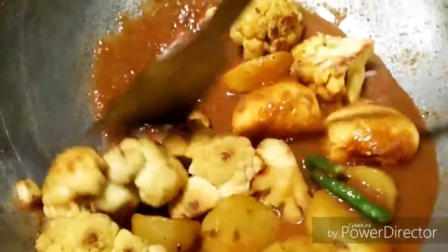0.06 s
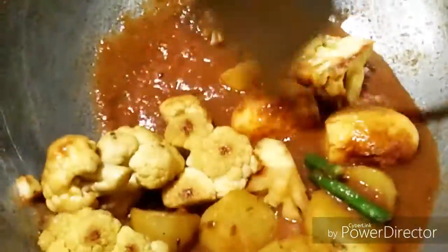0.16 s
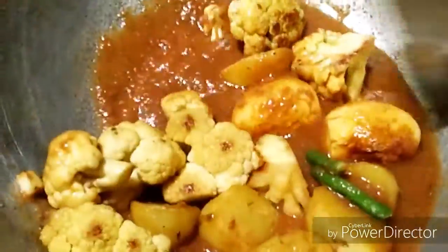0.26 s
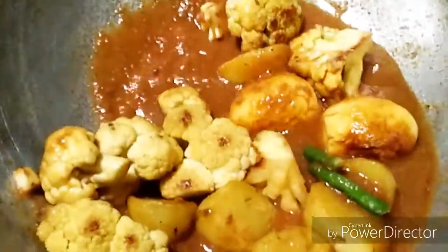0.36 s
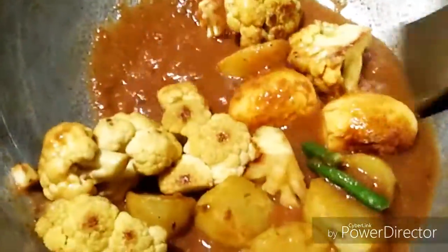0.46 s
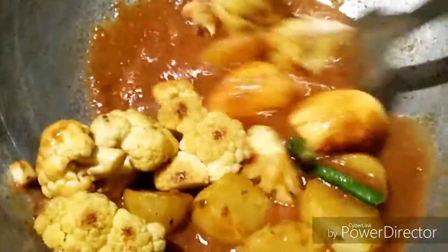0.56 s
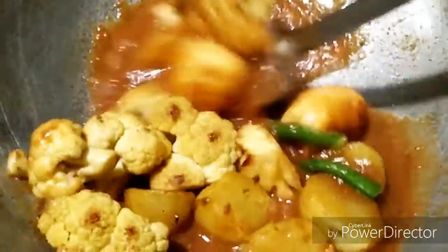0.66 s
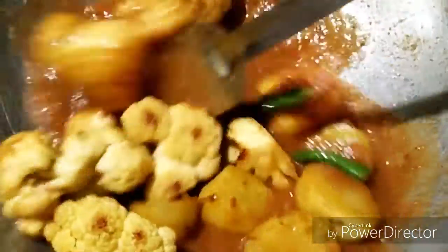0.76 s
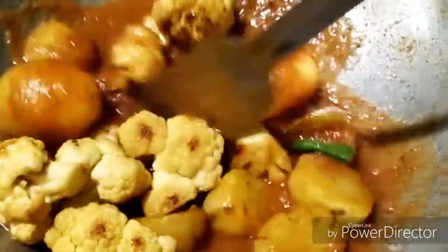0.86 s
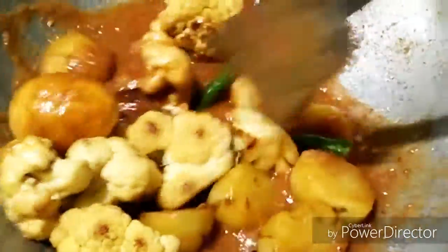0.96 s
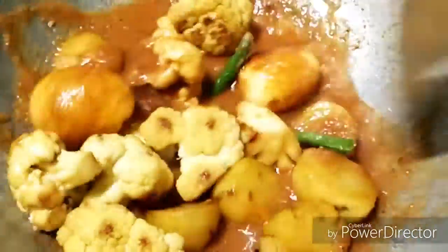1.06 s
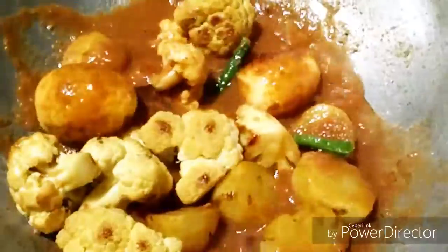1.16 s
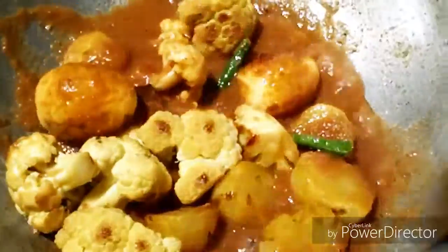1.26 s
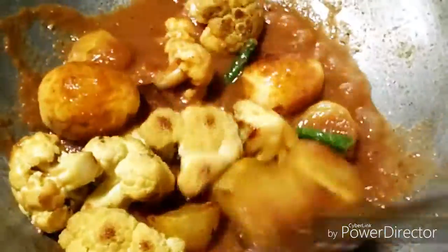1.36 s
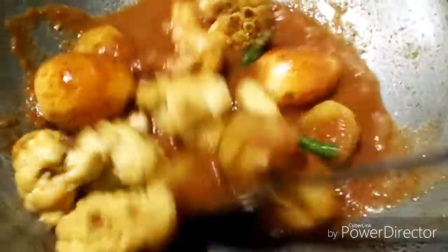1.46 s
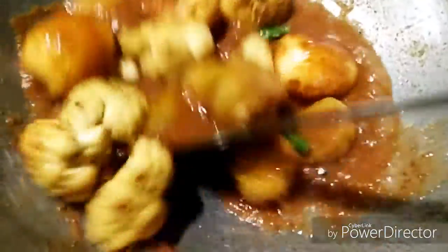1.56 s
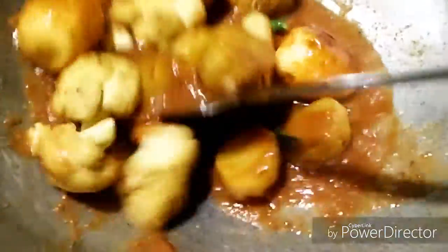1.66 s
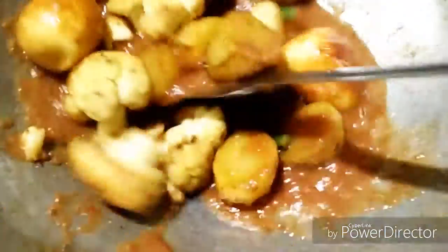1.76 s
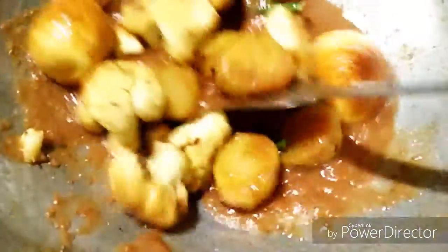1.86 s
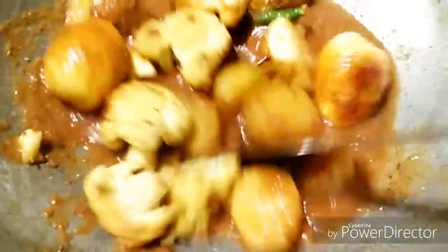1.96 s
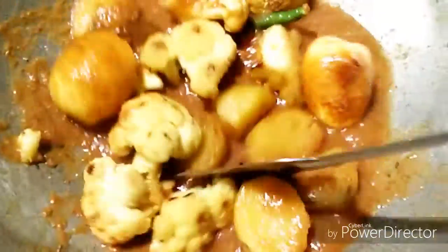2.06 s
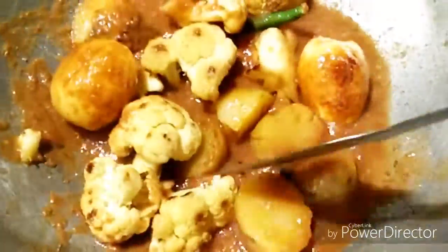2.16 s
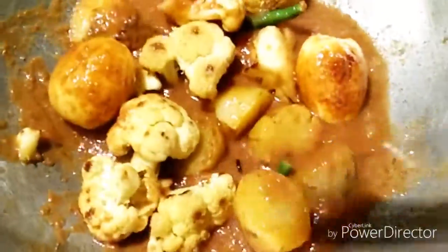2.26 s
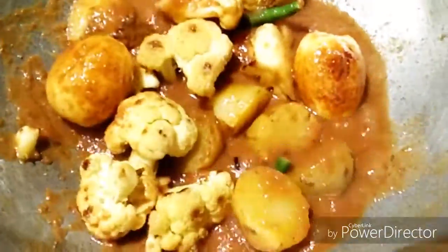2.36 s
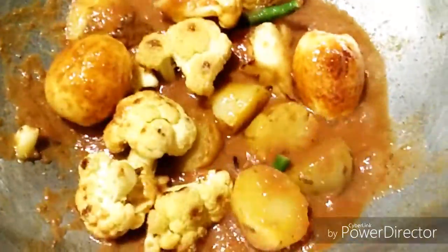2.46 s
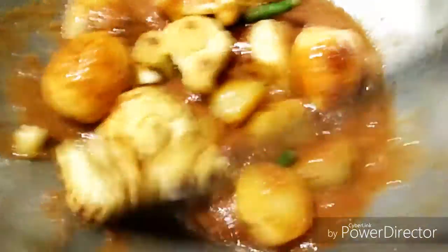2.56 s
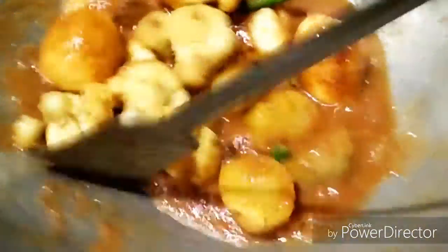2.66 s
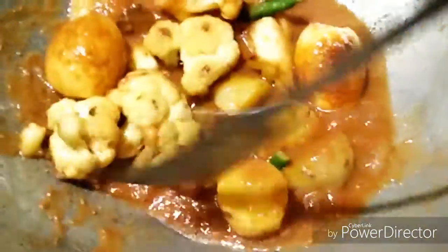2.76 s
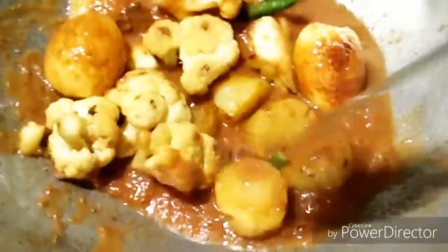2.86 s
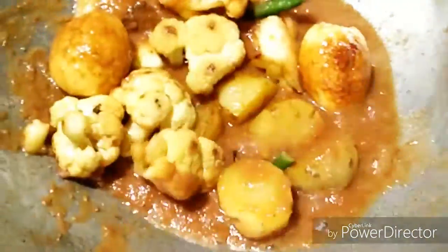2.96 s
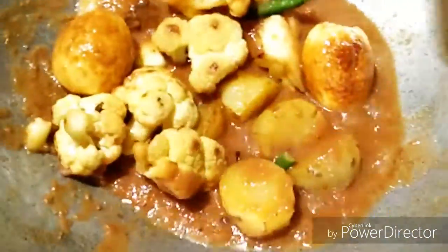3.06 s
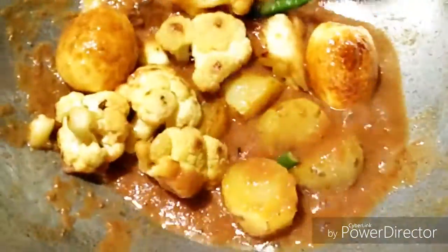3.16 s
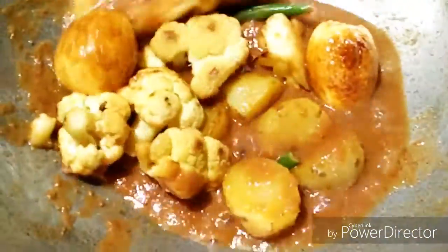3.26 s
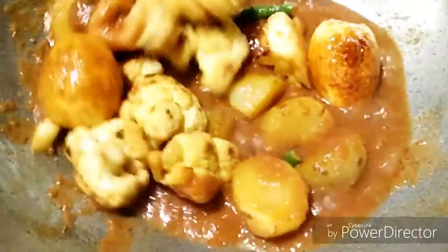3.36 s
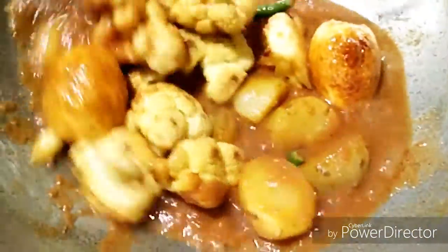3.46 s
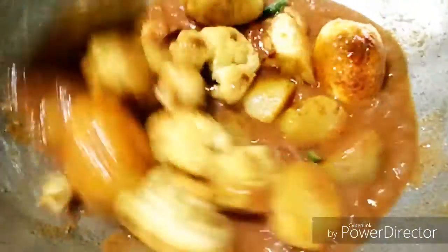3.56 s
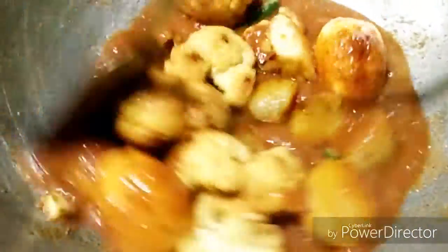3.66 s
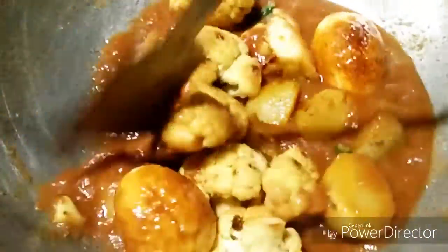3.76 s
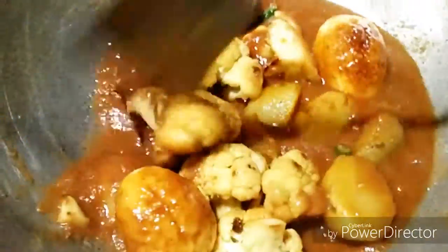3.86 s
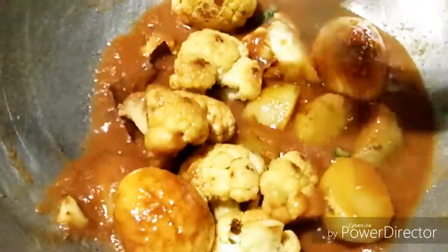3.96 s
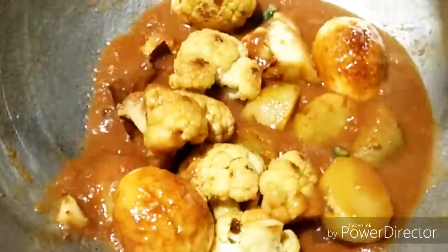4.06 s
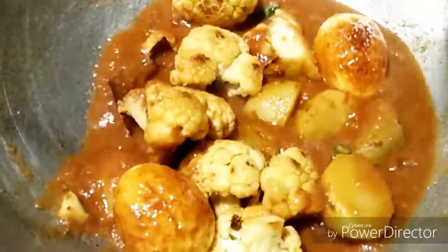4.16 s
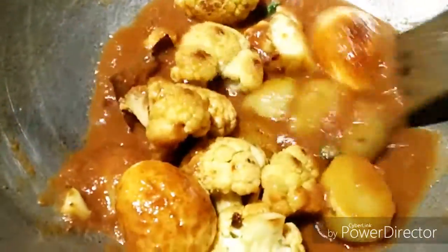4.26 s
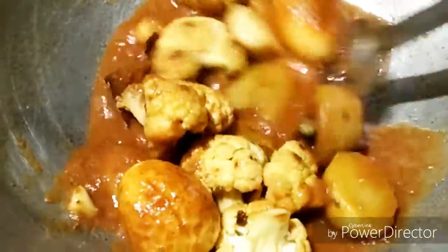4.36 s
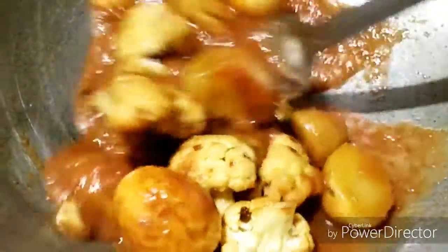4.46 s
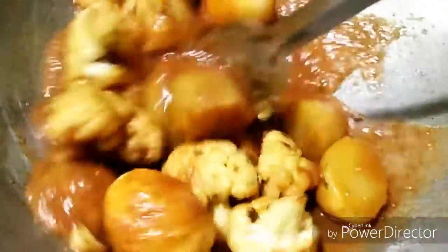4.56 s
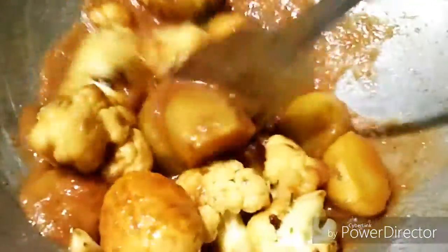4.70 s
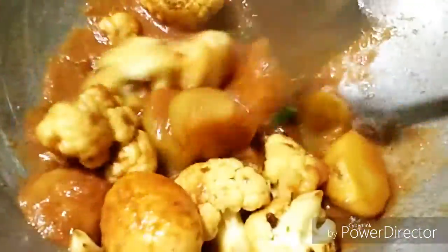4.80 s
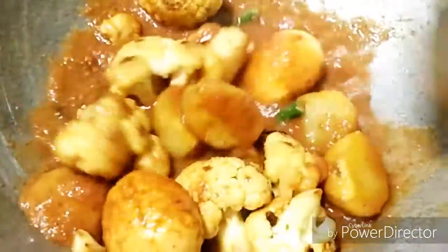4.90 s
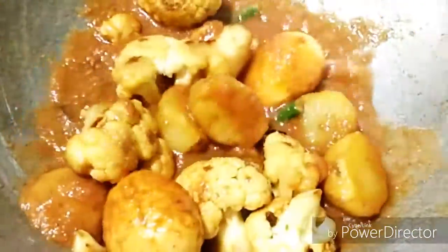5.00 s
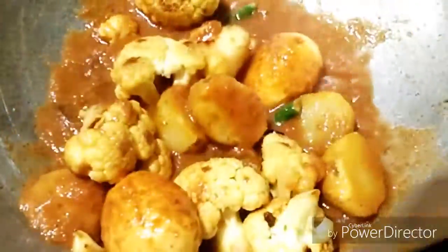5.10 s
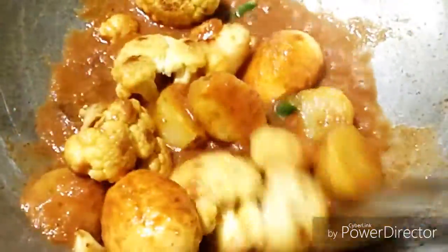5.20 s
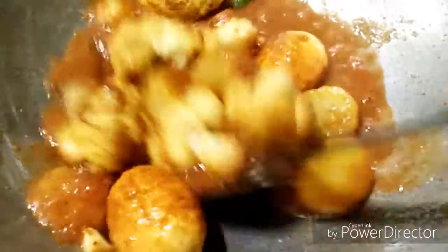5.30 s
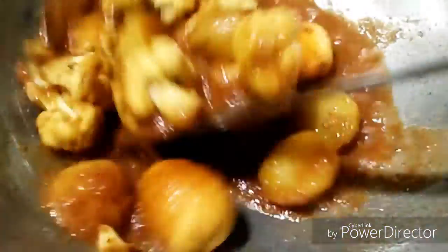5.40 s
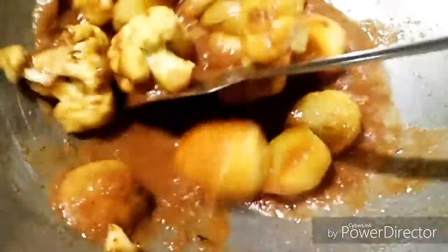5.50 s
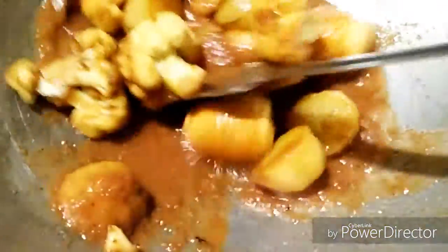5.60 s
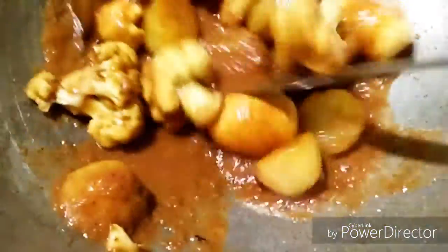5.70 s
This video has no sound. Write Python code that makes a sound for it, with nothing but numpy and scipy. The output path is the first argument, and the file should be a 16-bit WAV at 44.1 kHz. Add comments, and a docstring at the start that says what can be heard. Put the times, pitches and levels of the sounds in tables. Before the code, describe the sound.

A metal spatula scrapes and clanks in a metal wok, turning vegetables in thick wet sauce, with brief squeals and faint bubbling hiss.

```python
"""A steel spatula turns vegetables in thick sauce in a metal wok, close by in a small kitchen.
Each stroke pushes noise of steel, edge and wet food; bouncing clanks are damped blade and wok modes.
In two passages the edge sticks, slips and squeals, a gliding tone with overtones and grit.
Small pops, ringing cavities with a splash, fall throughout; below lie a fine hiss of random clicks
with short louder puffs, room noise and a faint low hum.
"""
import sys
import numpy as np
from scipy import signal
from scipy.fft import rfft, irfft
from scipy.io import wavfile
from scipy.ndimage import uniform_filter1d

SR = 44100
rng = np.random.default_rng(int(sys.argv[2]) if len(sys.argv) > 2 else 0)


def transcribe(signal):
    """Save signal, clipped to [-1, 1], as a 16-bit WAV file at the path in sys.argv[1]."""
    frames = np.atleast_2d(signal).T
    limited = np.clip(frames, -1, 1)
    pcm = np.round(limited * 32767).astype(np.int16)
    wavfile.write(sys.argv[1], SR, pcm)


N = 253089
TIME = np.arange(N) / SR


def amp(db):
    """Decibels to gain."""
    return 10 ** (np.asarray(db) / 20)


def unit(x):
    """Scales to rms 1."""
    return x / np.sqrt(np.mean(x ** 2) + 1e-20)


def read(points, hz):
    """Interpolates a (Hz, value) table on a log-frequency axis."""
    table_hz, value = np.transpose(points)
    return np.interp(np.log(hz + 1), np.log(table_hz + 1), value)


def add(mix, start_s, sound):
    """Mixes a sound in at start_s, or at 0 if that is negative."""
    part = mix[max(round(start_s * SR), 0):][:len(sound)]
    part += sound[:len(part)]


def colour(x, points):
    """Filters x by a (Hz, dB) table, at rms 1."""
    gain = amp(read(points, np.fft.rfftfreq(len(x), 1 / SR)))
    return unit(irfft(rfft(x) * gain, len(x)))


def wander(size, cutoff_hz):
    """Smooth random signal of rms 1: noise through a Gaussian low-pass."""
    hz = np.fft.rfftfreq(size, 1 / SR)
    low_pass = np.exp(-(hz / cutoff_hz) ** 2)
    return unit(irfft(rfft(rng.standard_normal(size)) * low_pass, size))


def grains(size, per_s, spread_db):
    """Random clicks of either sign, most small and a few large, at rms 1."""
    heights = amp(spread_db * np.minimum(rng.exponential(1, size), 5))
    heights = heights * rng.choice([-1, 1], size)
    return unit(heights * (rng.random(size) < per_s / SR))


def resonate(x, hz, width_hz):
    """A single two-pole resonance, at rms 1."""
    r = np.exp(-np.pi * width_hz / SR)
    poles = [1, -2 * r * np.cos(2 * np.pi * hz / SR), r * r]
    return unit(signal.lfilter([1, 0, -1], poles, x))


def fade(t, t60_s):
    """Dies by 60 dB in t60_s."""
    return np.exp(-np.log(1000) * t / t60_s)


def ring(t, hz, t60_s):
    """One dying mode."""
    return np.sin(2 * np.pi * hz * t) * fade(t, t60_s)


# Wok modes. Each row: frequency in Hz, mean level in dB, t60 in seconds.
WOK_MODES = [(357.91, -19, 0.3548), (419.55, -38.5, .3), (579.72, -31, 0.28), (693.86, -18, 0.16),
             (791, -39, 0.11), (1139.7, -37, 0.054), (1411.9, -27.5, 0.16), (1503.6, -30.5, 0.12),
             (2222.5, -13.5, 0.034), (2854.6, -13.5, 0.11), (3137.3, -21, 0.2), (3774.6, -17.5, 0.12714),
             (4337.4, -13.5, 0.14), (4385.5, -22.5, 0.048), (4826.8, -3.5, 0.031), (5066.6, -5, 0.12),
             (5121, -15, 0.037), (6760, -36, 0.047), (8856, -23.5, .08), (8872.6, -12, 0.023)]


def pan_ring(bowl_db, scatter_db=2.698, wobble_rad=0.7434, wobble_hz=50):
    """The wok's answer to a tap; the pressing blade and the shifting food make each mode waver."""
    t, out = TIME[:16384], 0
    for hz, db, t60_s in WOK_MODES:
        phase = 2 * np.pi * hz * t + wobble_rad * wander(len(t), wobble_hz)
        level_db = db + scatter_db * rng.standard_normal() + bowl_db * (hz < 1000)
        out = out + amp(level_db) * np.sin(phase) * fade(t, t60_s)
    return out


def through_pan(x):
    """A vibration of the blade passed on to the wok, at rms 1."""
    return unit(signal.fftconvolve(x, pan_ring(0))[:len(x)])


# Room noise spectrum. Each row: frequency in Hz, relative level in dB.
ROOM_SPECTRUM = [(20, -8), (33, -7.5), (50, 9), (110, 4), (190, 6.5), (500, -53), (1400, -25.5),
                 (4500, -35), (7000, -10.5), (15000, -37.5)]
# Swells of the hum. Each row: loudest moment in seconds, half length (to 1/e of the dB rise) in seconds,
# rise in dB.
HUM_SWELLS = [(1.037, 0.166, 12), (2.05, 0.2335, 15), (2.712, .15, 4), (3.746, 0.37, 11),
              (4.304, 0.2018, 12.5)]


def background(floor_db=-66, hum_hz=86.5, hum_db=-70, flutter=0.6):
    """Room noise and a fluttering low hum that swells now and then."""
    phase = 2 * np.pi * np.cumsum(hum_hz + 3 * wander(N, 9.5)) / SR
    tone = (1 + flutter * wander(N, 22)) * np.sin(phase) + flutter * wander(N, 29) * np.cos(phase)
    swell_db = sum(db * np.exp(-((TIME - s) / half_s) ** 2) for s, half_s, db in HUM_SWELLS)
    noise = colour(rng.standard_normal(N), ROOM_SPECTRUM)
    return amp(hum_db + swell_db) * unit(tone) + amp(floor_db) * noise


# Short soft puffs of hiss. Each row: start in seconds, length in seconds,
# level added to the steady hiss in dB, before the random flicker.
HISS_PUFFS = [(0.333, 0.048, -55.5), (0.482, 0.02871, -56), (2.297, 0.03833, -61), (2.493, 0.0342, -59.5),
              (3.009, 0.10772, -60.5), (3.157, 0.06277, -53), (4.109, 0.05511, -57.5),
              (4.269, 0.073, -56.5), (4.991, 0.02674, -63), (5.084, 0.04483, -62.5)]
# Hiss spectrum. Each row: frequency in Hz, relative level in dB.
HISS_SPECTRUM = [(30, -40.5), (200, 5.5), (700, -0.5), (1500, 0), (2800, 0), (4400, 2.5), (6500, -6),
                 (10000, -17), (14500, -31)]


def hiss(steady_db=-65, flicker_db=3.5):
    """Fine hiss of dense random clicks, its level flickering, with short louder puffs."""
    level = np.full(N, amp(steady_db))
    for start_s, length_s, db in HISS_PUFFS:
        add(level, start_s, amp(db) * signal.windows.tukey(int(length_s * SR), .15))
    clicks = grains(N, 7000, 2.6)
    return level * amp(flicker_db * wander(N, 35)) * colour(clicks, HISS_SPECTRUM)


def squelch(size, low_hz, high_hz, per_s, cycles, spread_db, count=24):
    """Small wet cavities open at random, each ringing for a few cycles at its own pitch; rms 1."""
    out, t = np.zeros(size), TIME[:SR // 10]
    for hz in np.geomspace(low_hz, high_hz, count) * rng.uniform(0.96198, 1.03, count):
        cavity = ring(t, hz, cycles / hz) * (1 - np.exp(-t * hz))
        sizes = amp(spread_db * np.minimum(rng.exponential(1, size), 4))
        openings = sizes * (rng.random(size) < per_s / count / SR)
        out += hz ** 1.2746 * signal.oaconvolve(openings, cavity)[:size]
    return unit(out)


def patchy(x, depth_db):
    """The contact point keeps shifting: patches of the spectrum come and go; rms 1."""
    z = signal.stft(x, SR, nperseg=256)[2]
    over_hz = uniform_filter1d(rng.standard_normal(z.shape), 4, 0)
    patches = unit(uniform_filter1d(over_hz, 7, 1))
    return unit(signal.istft(z * amp(depth_db * patches), SR, nperseg=256)[1][:len(x)])


# Pushes of the blade. Each row: start in seconds, length in seconds, then levels in dB before the layer
# gains: steel scrape, rasp of the edge, sliding food; last, change of the scrape by the end in dB.
PUSHES = [(-0.02, 0.07202, -38.5, -42.5, -52, 1), (0.041, 0.038195, -28.5, -36.5, -37, -1),
          (0.218, 0.05004, -56.5, -49.5, -51, 3.5), (0.629, 0.10742, -31.5, -40, -45.5, -8.5),
          (0.737, 0.183, -42, -40.5, -40.5, -3), (0.987, 0.2965, -58.5, -53.5, -46, -1),
          (1.451, 0.44437, -46, -46.5, -44, -7.5), (1.945, .288, -53.5, -46.5, -47.5, 6.5),
          (2.609, 0.13293, -45.5, -42, -45, 6), (2.741, 0.07215, -34, -38, -43, -7.5),
          (2.838, 0.09424, -57.5, -48.5, -50.5, 3.5), (3.271, 0.24827, -30.5, -44, -49, -18.5),
          (3.53, .13, -38, -46.5, -42.5, -11), (3.659, .18, -49.5, -44, -44.5, 10),
          (4.396, 0.2152, -39.5, -39, -41.5, -5), (4.609, 0.2964, -49, -44, -48.5, -5.5),
          (5.28, 0.11513, -40, -44, -47, 1), (5.389, 0.16176, -38.5, -39, -45.5, -7),
          (5.54, 0.16135, -48, -49, -52, -10.5)]
# Steel on steel. Each row: frequency in Hz, relative level in dB.
SCRAPE_SPECTRUM = [(1400, -53), (2400, -6), (3100, -1), (3700, 0.5), (4400, 2.5), (5600, -3), (6700, -4),
                   (9000, -12.5), (11500, -20.5), (14500, -30.5)]
# The edge in the sauce. Each row: frequency in Hz, relative level in dB.
RASP_SPECTRUM = [(600, -7.5), (1100, 14), (1500, 12.5), (2000, 15), (2700, 10.5), (3800, -13.5),
                 (7000, -29.5), (14500, -49.5)]
# Moving food, also in thuds and flops. Each row: frequency in Hz, relative level in dB.
FOOD_SPECTRUM = [(25, -41.5), (70, -7), (170, -3.5), (350, 6.5), (600, -3.5), (950, -3.5), (1500, -11),
                 (6000, -6.5), (14500, -42.5)]
PUSH_ATTACK_S, PUSH_RELEASE_DB_PER_S = 0.02772, 280
FOOD_DB_PER_S = -14.5  # through a push the food slides clear of the blade


def strokes(scrape_db=-2.0, rasp_db=-10.0, food_db=-10.0, ring_db=-10, judder_db=1.4767,
            patchy_db=3.5, wet_db=-1):
    """The edge catches on countless small bumps while it pushes wet food along."""
    out = np.zeros(N)
    smacks = squelch(N, 916.95, 3148.7, per_s=320, cycles=60, spread_db=-1.5)
    slosh = squelch(N, 180.33, 942.2, per_s=420, cycles=17.933, spread_db=-0.5)
    for start_s, length_s, steel_db, edge_db, slide_db, change_db in PUSHES:
        end_s = start_s + length_s + 30 / PUSH_RELEASE_DB_PER_S  # release runs down 30 dB
        at = np.flatnonzero((TIME >= start_s) & (TIME < end_s))
        t, size = TIME[at] - start_s, len(at)
        release = amp(-PUSH_RELEASE_DB_PER_S * np.maximum(t - length_s, 0))
        push = np.minimum(t / PUSH_ATTACK_S, 1) * release
        pressure = amp(judder_db * wander(size, 51))

        steel = colour(grains(size, 6000, 1.3663) * pressure, SCRAPE_SPECTRUM)
        steel = steel + amp(ring_db) * through_pan(rng.standard_normal(size))
        steel_level = amp(scrape_db + steel_db + change_db * np.minimum(t / length_s, 1))

        edge = colour(grains(size, 4000, 3.0) * pressure, RASP_SPECTRUM)
        edge = unit(edge + amp(wet_db) * colour(smacks[at], RASP_SPECTRUM))

        food = colour(slosh[at] + grains(size, 1100, 1.4), FOOD_SPECTRUM)
        food_level = amp(food_db + slide_db + FOOD_DB_PER_S * t)

        sound = steel_level * patchy(steel, patchy_db)
        sound += amp(rasp_db + edge_db) * edge
        sound += food_level * food
        add(out, start_s, push * sound)
    return out


# Squeals. Each row: start in seconds, length in seconds, moment of the hardest bite in seconds from 0,
# level at mid-length in dB before shaking, first Hz, last Hz (both before bite and drift),
# pitch drop at the bite in Hz, roughness at the bite 0-1.
SQUEALS = [(0.005, 0.07524, .07, -30.5, 865, 731.9, 105, 0),
           (0.054, .095, .083, -27, 706.8, 717.2, 154, 0.53),
           (3.483, 0.2159, 3.575, -50, 1000, 820.4, 2.5, 0.3),
           (3.671, 0.2, 3.77, -38.5, 835, 814.1, 51, 0.17),
           (3.803, .075, 3.835, -34.5, 737.1, 669, 17, 0.16)]
# Grit of the slipping edge. Each row: frequency in Hz, relative level in dB.
GRIT_SPECTRUM = [(100, -54.5), (350, -52.5), (560, 12), (705, 7.5), (850, -4.5), (1140, 12.5), (1450, 7),
                 (1950, -10), (3000, -13.5), (8000, -53)]
# Resonances that the slipping edge shakes. Each row: frequency in Hz, width in Hz,
# level in dB relative to the squeals' overall rms.
SHAKEN_MODES = [(1106, 16.36, -10), (1399.9, 52.36, -10), (1513.4, 52.28, -14.5)]
BITE_S, LIGHT_ROUGH = 0.01659, 0.09775  # bite's 1/e half length; roughness away from the bite
SQUEAL_ENDS_DB = -15.5  # ends of the level arch


def squeals(jitter=0.07887, overtone_db=-2, grit_db=-6, pan_db=-9, drift=0.026173, shake_db=3.5):
    """The edge sticks and slips: biting lowers the tone; roughness adds overtones, grit and wok ring."""
    out, chatter = np.zeros((2, N))
    for start_s, length_s, bite_at_s, mid_db, first_hz, last_hz, drop_hz, bite_rough in SQUEALS:
        t = np.arange(0, length_s, 1 / SR)
        size, along = len(t), t / length_s
        bite = np.exp(-((start_s + t - bite_at_s) / BITE_S) ** 2)
        rough = LIGHT_ROUGH + (bite_rough - LIGHT_ROUGH) * bite

        glide_hz = first_hz + (last_hz - first_hz) * along - drop_hz * bite
        hz = glide_hz * (1 + drift * wander(size, 53.1))
        phase = 2 * np.pi * np.cumsum(hz * (1 + jitter * rough * wander(size, 530))) / SR
        overtones = np.sin(2 * phase) + sum(np.sin(k * phase) / k for k in range(3, 12))
        grit = colour(rng.standard_normal(size), GRIT_SPECTRUM) * (1 + np.cos(phase) / 2)

        arch_db = mid_db + SQUEAL_ENDS_DB * (2 * along - 1) ** 2
        level = amp(arch_db + shake_db * wander(size, 190)) * signal.windows.tukey(size, .04)
        tone = np.sin(phase) + 2 * rough ** 2 * amp(overtone_db) * overtones
        add(out, start_s, level * (tone + rough * amp(grit_db) * grit))
        add(chatter, start_s, level * rough * grit)
    shaken = sum(amp(db) * resonate(chatter, hz, width_hz) for hz, width_hz, db in SHAKEN_MODES)
    return out + np.std(out) * (amp(pan_db) * through_pan(chatter) + shaken)


# Narrow singing slips. Each row: start in seconds, length in seconds, frequency halfway in Hz,
# level in dB before the window.
SCRATCHES = [(0.051, 0.04958, 2906, -36), (0.057, 0.0447, 6230, -36), (0.64, 0.029, 6715, -37),
             (0.877, 0.02508, 6620, -44), (1.475, 0.02723, 5380, -40), (2.681, 0.01793, 4340, -37.5),
             (2.756, 0.0579, 4630, -36.5), (3.292, 0.02978, 4376, -30), (3.346, 0.05114, 4290, -38.5),
             (3.534, 0.0901, 6600, -45), (3.722, 0.09475, 6140, -43), (0.677, 0.01729, 8478, -44.5),
             (4.418, 0.016, 8283, -40), (5.463, 0.06636, 1869, -45.5), (5.607, 0.02025, 4064, -44)]


def scratches(width_hz=450, sink=0.035673):
    """Slips ring a resonance of the blade, which sinks as more of the edge bears on the metal."""
    out = np.zeros(N)
    for start_s, length_s, hz, db in SCRATCHES:
        size = int(length_s * SR)
        along = np.linspace(0, 1, size)
        phase = 2 * np.pi * np.cumsum(hz * (1 - sink * (along - .5))) / SR
        sound = wander(size, width_hz) * np.cos(phase) + wander(size, width_hz) * np.sin(phase)
        add(out, start_s, amp(db) * unit(sound) * signal.windows.tukey(size, .5))
    return out


BUBBLES_PER_S, BUBBLE_DB, BUBBLE_LOW_HZ, BUBBLE_HIGH_HZ = 9.4, -41.5, 1815.6, 5485  # dB before pop_db


def small_bubbles(spread_db=3):
    """Random rows of (s, dB, Hz) for the bubbles of the simmering sauce."""
    rows = []
    for when, size, pitch in rng.random((round(BUBBLES_PER_S * N / SR), 3)):
        hz = BUBBLE_LOW_HZ * (BUBBLE_HIGH_HZ / BUBBLE_LOW_HZ) ** pitch
        rows.append((when * N / SR, BUBBLE_DB + spread_db * (2 * size - 1), hz))
    return rows


# Larger bubbles and wet smacks. Each row: start in seconds, level in dB before pop_db, frequency in Hz.
LARGE_POPS = [(0.806, -18, 1422), (1.023, -27, 2065), (1.977, -29, 1948), (1.1956, -36, 4291),
              (2.437, -41.5, 3560), (3.148, -41.5, 2020), (3.562, -28.5, 1420), (3.678, -33, 1600),
              (3.96, -32, 2393), (4.132, -40, 3620), (4.222, -34.5, 2627), (4.568, -17.5, 1504),
              (4.942, -35, 2114), (5.4119, -24.5, 1240)]


def pops(pop_db=-7, pop_t60_s=0.017126, splash_db=3, splash_width_hz=1100, rise_s=0.0014):
    """A bubble bursts: a few cycles of its cavity and a small splash."""
    out, t = np.zeros(N), TIME[:SR // 20]
    for start_s, db, hz in LARGE_POPS + small_bubbles():
        splash = resonate(rng.standard_normal(len(t)), hz, splash_width_hz)
        splash = resonate(splash, hz, hz) * fade(t, pop_t60_s)
        burst = ring(t, hz, pop_t60_s) + amp(splash_db) * splash
        add(out, start_s, amp(db + pop_db) * (1 - np.exp(-t / rise_s)) * burst)
    return out


# Blade meets pan; where it lands picks two blade modes. Each row: start in seconds, delay of the whole
# edge in seconds, corner level in dB, edge level in dB, centre of the bright band in Hz, low mode in Hz,
# its dB, high mode in Hz, its dB, t60 of both in seconds, change of wok modes under 1 kHz and thud in dB.
KNOCKS = [(0.5344, 0.012273, -11, -9, 4564, 3181, -18, 4330, -21, 0.0624, -16.5),
          (0.6130, 0.0022703, -32.5, -19.5, 5193, 3060, -19, 5600, -18, 0.04715, -12),
          (1.378, .0038, -16.5, -8, 5981, 2895, -7.5, 5920, -4.5, 0.04943, -8),
          (2.5606, .0036, -14, -11, 5243, 2892, -19, 6416, -10, 0.0821, -8.5),
          (2.6110, 0.003694, -24.5, -28, 4668, 3107, -5.5, 6340, -20, 0.03554, -2.5),
          (3.2015, 0.009517, -14.5, -11.5, 5076, 3254, -2, 4480, -3, 0.0315, -13.5),
          (3.276, 0.002472, -26.5, -30, 4403, 3200, -11.5, 4700, -3.5, 0.0749, -14),
          (3.3008, .006, -21.5, -34.5, 4288, 3212, -8, 7600, -8.5, 0.08815, -24),
          (3.412, 0.0036, -30.5, -43, 4080, 3750, 6, 4400, -1.5, 0.04885, -1.5),
          (4.3106, .0095, -13, -5, 4798, 3132, -8, 4780, -18, 0.11625, -14.5),
          (5.1827, 0.0051, -16.5, -19, 5498, 2863, -9, 5253, 4.5, 0.02935, -11.5),
          (5.1959, .002, -19.5, -18, 4985, 3049, -10, 4485, -8.5, 0.0699, -4.5)]
FIRST_RISE_S, LATER_RISE_S = 0.0007295, 0.000547  # onset times of the first contact and the later ones
REBOUND_SHARE, REBOUND_DB = .7, -11.5  # share of the first delay; level relative to the edge


def contacts():
    """Each knock is three contacts: the corner, the whole edge, and a sooner, softer rebound."""
    for start_s, delay_s, corner_db, edge_db, *tone in KNOCKS:
        yield start_s, FIRST_RISE_S, corner_db, *tone
        yield start_s + delay_s, LATER_RISE_S, edge_db, *tone
        rebound_s = start_s + delay_s * (1 + REBOUND_SHARE)
        yield rebound_s, LATER_RISE_S, edge_db + REBOUND_DB, *tone


# Crowded, quickly damped modes of blade and wok. Each row: frequency in Hz, relative level in dB.
CRACK_SPECTRUM = [(30, -58), (150, -45), (300, -19.5), (900, -5.5), (1400, -3.5), (1750, -19), (2400, -11),
                  (3000, 8), (3700, 0), (5000, 9.5), (6300, -0.5), (7300, -4), (9500, -2.5), (11500, -12.5),
                  (14500, -16)]
# Reshaping of the crack into its wash. Each row: frequency in Hz, gain in dB.
WASH_SPECTRUM = [(1500, -8.5), (3100, -7.5), (6000, 4), (9000, -4)]


def knocks(crack_t60_s=0.029005, bright_db=-2, bright_width_hz=1100, crack_db=-1, pan_db=-7,
           wash_db=-12, wash_t60_s=0.017667, thud_db=-18, thud_t60_s=0.33697):
    """Each contact: a crack of crowded modes, the ring of blade and wok, and the thud of jolted food."""
    out, t = np.zeros(N), TIME[:16384]
    for (start_s, rise_s, db, bright_hz, low_hz, low_db, high_hz, high_db,
         blade_t60_s, bowl_db) in contacts():
        crack_noise, bright_noise, thud_noise = rng.standard_normal((3, len(t)))
        bright = resonate(bright_noise, bright_hz, bright_width_hz)
        bright = resonate(bright, bright_hz, 2 * bright_width_hz)
        crack = colour(crack_noise, CRACK_SPECTRUM) + amp(bright_db) * bright
        crack /= np.sqrt(np.mean(crack[:SR // 200] ** 2))  # rms 1 over the first 5 ms

        clatter = amp(crack_db) * crack * fade(t, crack_t60_s)
        clatter = clatter + amp(wash_db) * colour(crack, WASH_SPECTRUM) * fade(t, wash_t60_s)
        blade = amp(low_db) * ring(t, low_hz, blade_t60_s)
        blade = blade + amp(high_db) * ring(t, high_hz, blade_t60_s)
        wok = amp(pan_db) * pan_ring(bowl_db)
        thud = amp(thud_db + bowl_db) * colour(thud_noise, FOOD_SPECTRUM) * fade(t, thud_t60_s)
        onset = (1 - np.exp(-t / rise_s)) ** 2
        add(out, start_s, amp(db) * onset * (clatter + blade + wok + thud))
    return out


# Food flopping back into the sauce. Each row: start in seconds, level in dB before the envelope.
FLOPS = [(0.9, -43), (1.152, -57.5), (1.976, -72), (2.216, -52), (3.393, -31), (3.517, -35.5), (4.953, -52)]


def flops(rise_s=0.0075, t60_s=0.096):
    """A soft, wet thud for each piece that falls back."""
    out, t = np.zeros(N), TIME[:SR // 4]
    for start_s, db in FLOPS:
        envelope = (1 - np.exp(-t / rise_s)) * fade(t, t60_s)
        add(out, start_s, amp(db) * envelope * colour(rng.standard_normal(len(t)), FOOD_SPECTRUM))
    return out


# Kitchen decay. Each row: frequency in Hz, t60 in seconds.
KITCHEN_DECAY = [(200, 1), (500, 0.42954), (1500, 0.2552), (5000, 0.27613), (12000, 0.3841)]


def kitchen(x, gap_s=0.006):
    """Dense reflections after a short gap, each band dying at its own speed."""
    hz, t, z = signal.stft(rng.standard_normal(SR), SR, nperseg=256)
    decay = fade(t, read(KITCHEN_DECAY, hz)[:, None])
    tail = signal.istft(z * decay, SR, nperseg=256)[1]
    tail *= 1 - np.exp(-(TIME[:len(tail)] / gap_s) ** 2)
    return signal.fftconvolve(x, tail / np.linalg.norm(tail))[:N]


def scene(knock_room_db=-10, pan_room_db=-11):
    """Everything in the wok, the hiss, and the room around it."""
    blows = knocks()
    stirring = strokes() + flops() + scratches() + squeals() + pops() + hiss()
    room = kitchen(amp(knock_room_db) * blows + amp(pan_room_db) * stirring)
    return (blows + stirring + room + background())[None]


EDGE_HZ = 14400


def record(dry):
    """Full-scale limit, then a low-pass at EDGE_HZ."""
    low_pass = signal.firwin(401, EDGE_HZ, window=("kaiser", 8), fs=SR)
    return signal.oaconvolve(np.clip(dry, -1, 1), low_pass[None], "same")


dry = scene()
out = record(dry)
transcribe(out)
```